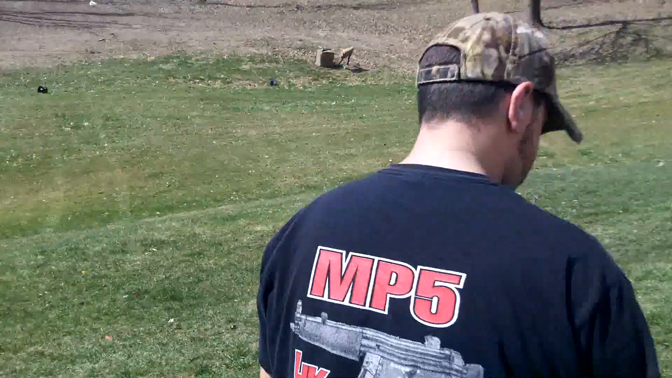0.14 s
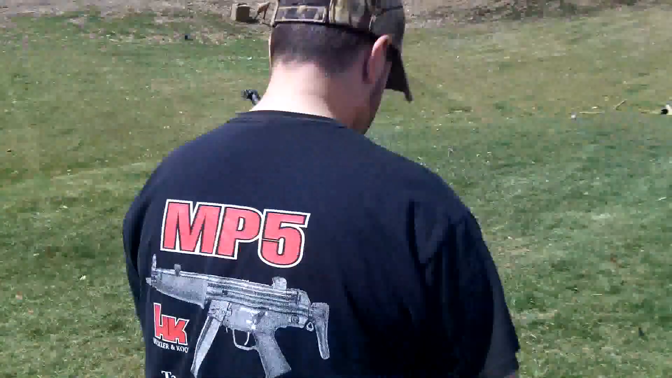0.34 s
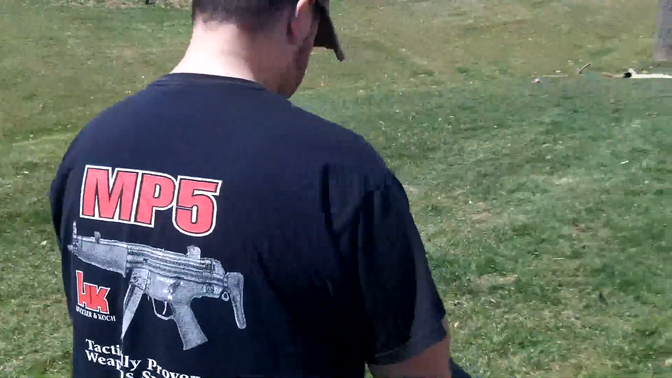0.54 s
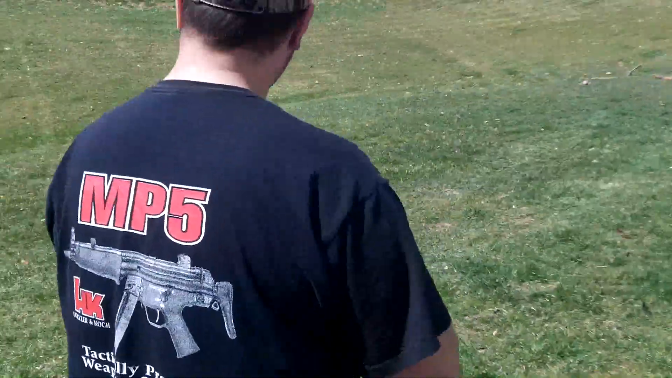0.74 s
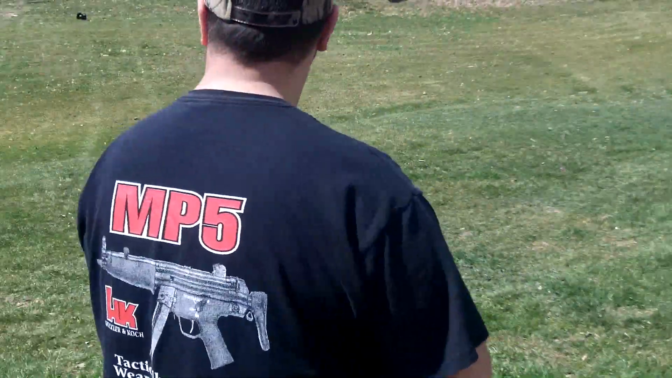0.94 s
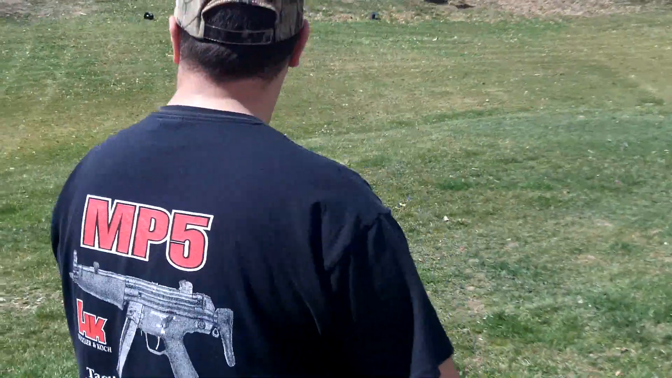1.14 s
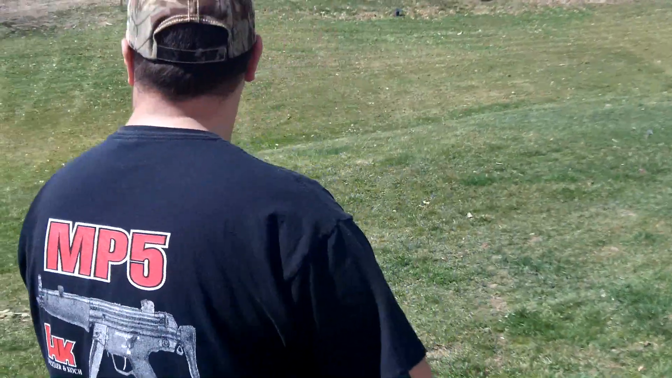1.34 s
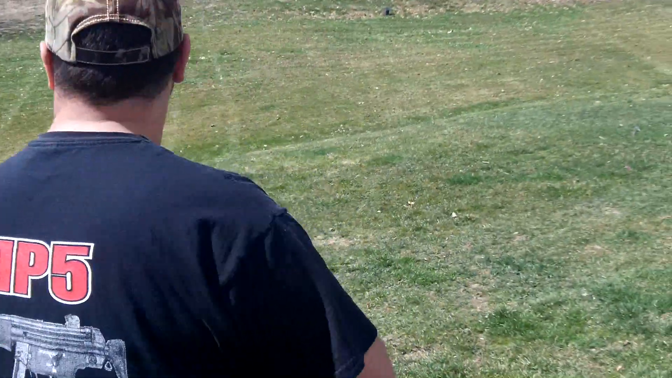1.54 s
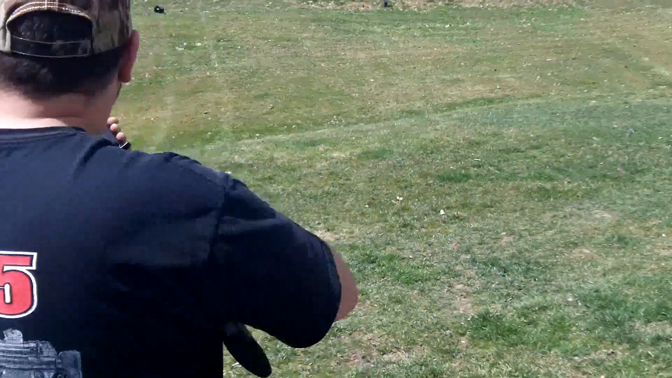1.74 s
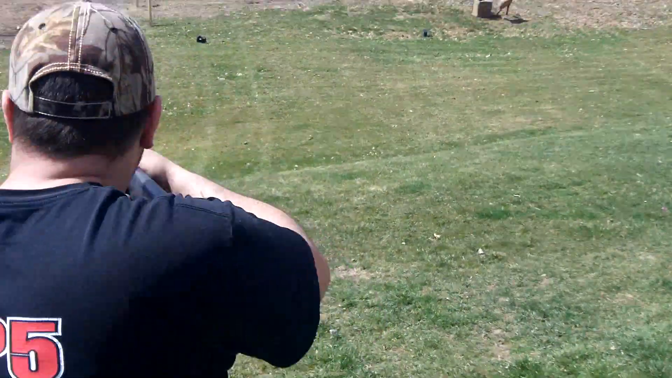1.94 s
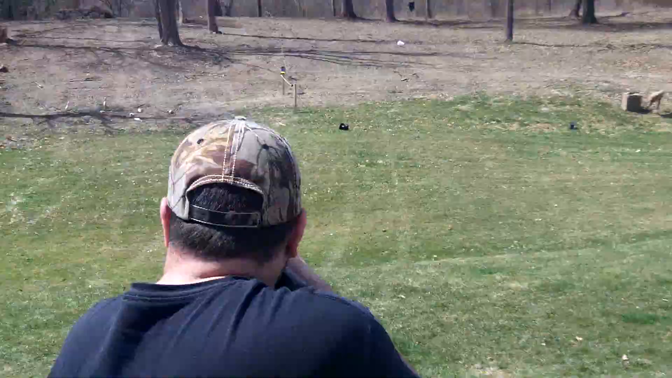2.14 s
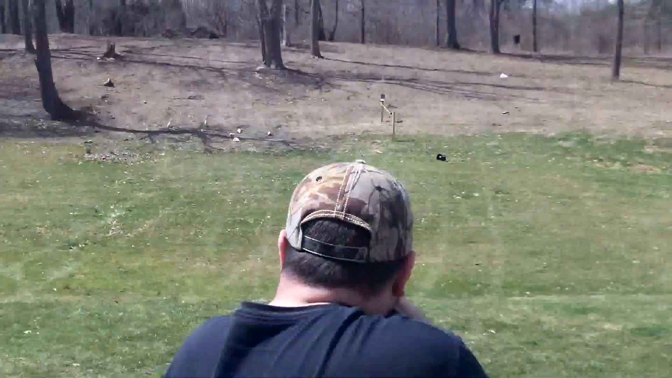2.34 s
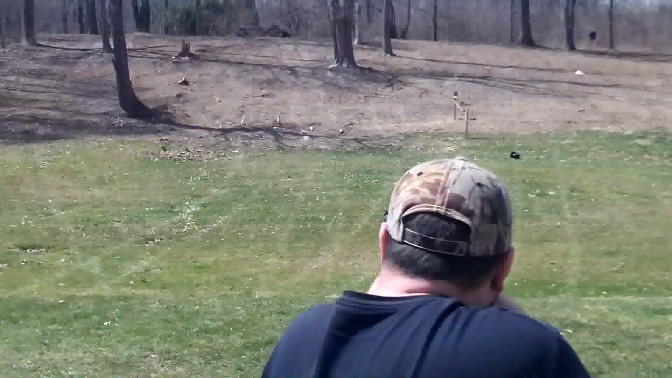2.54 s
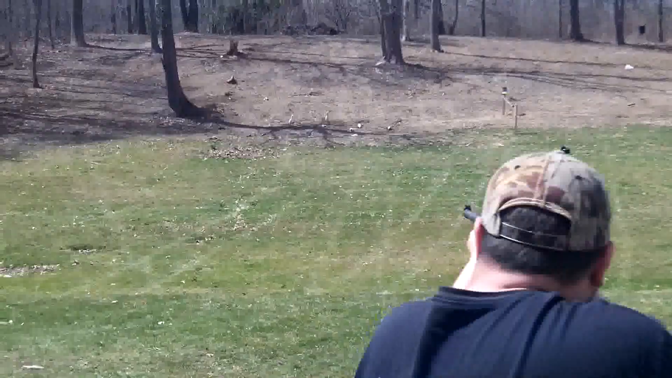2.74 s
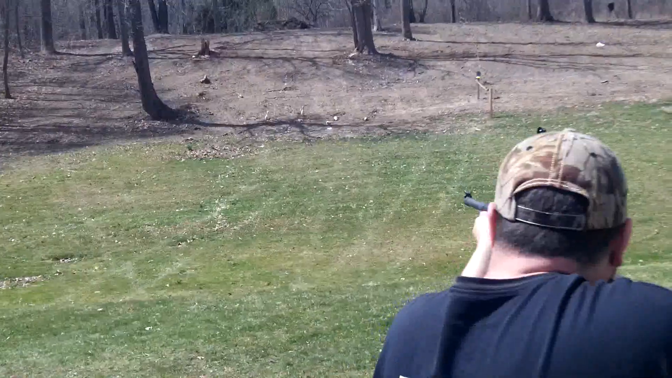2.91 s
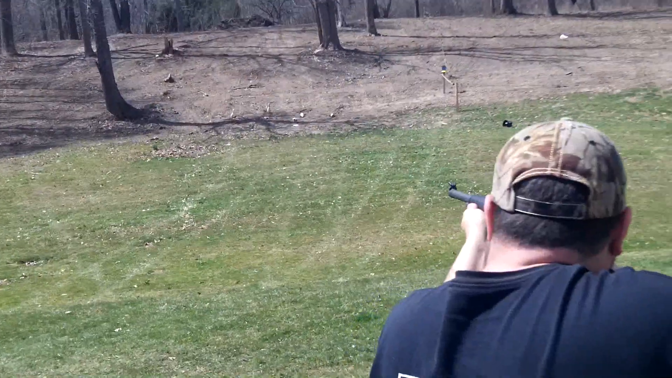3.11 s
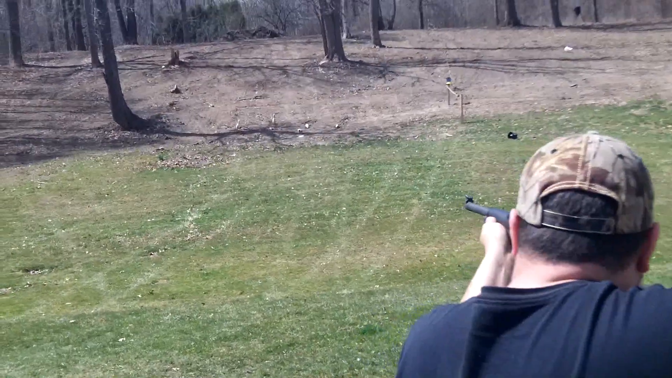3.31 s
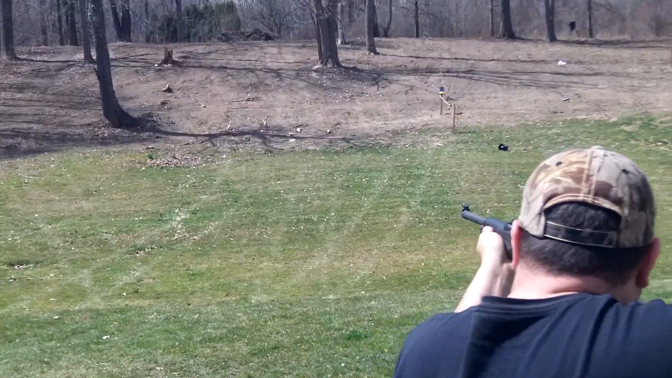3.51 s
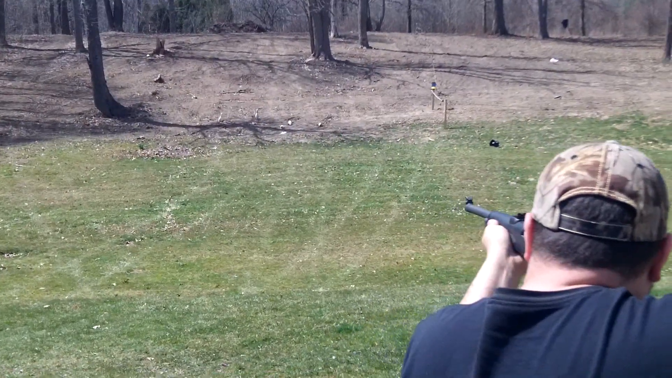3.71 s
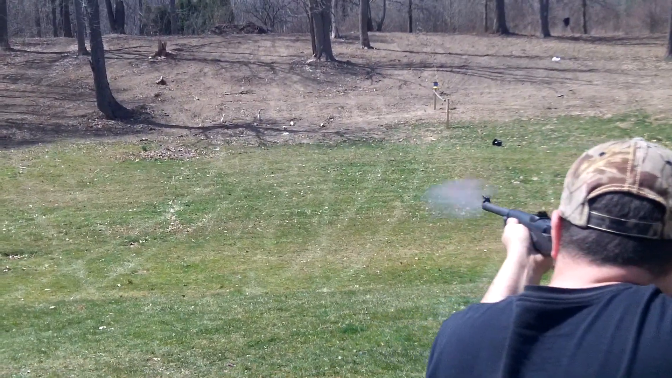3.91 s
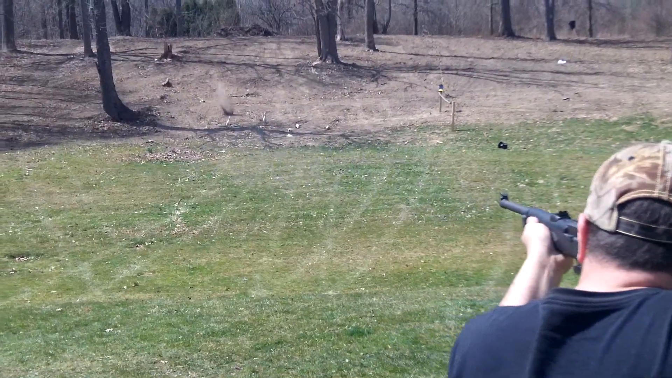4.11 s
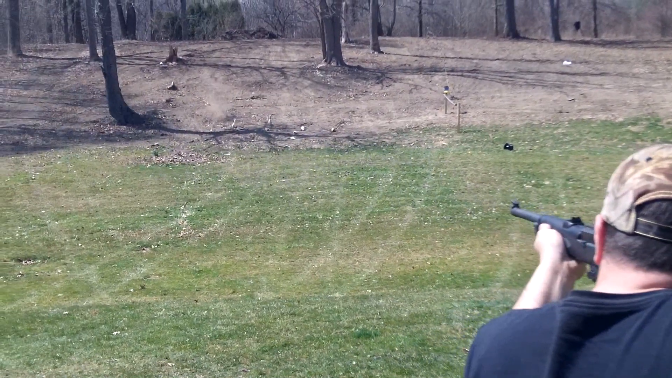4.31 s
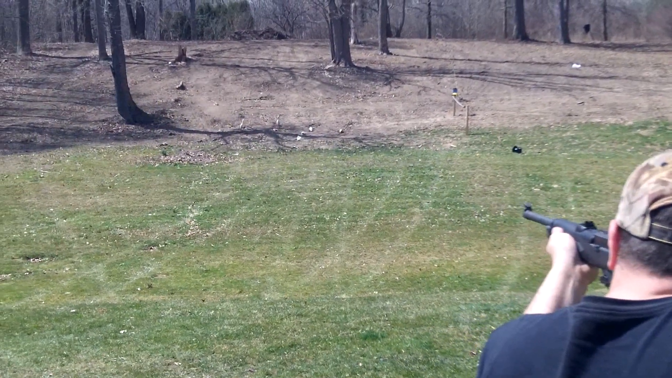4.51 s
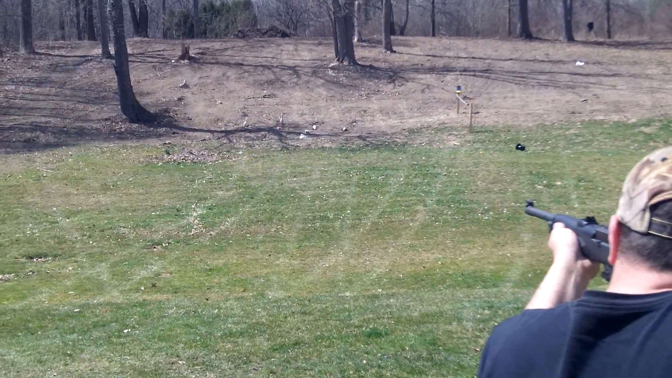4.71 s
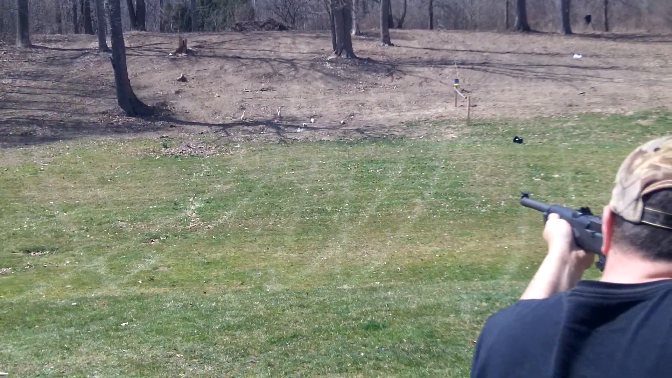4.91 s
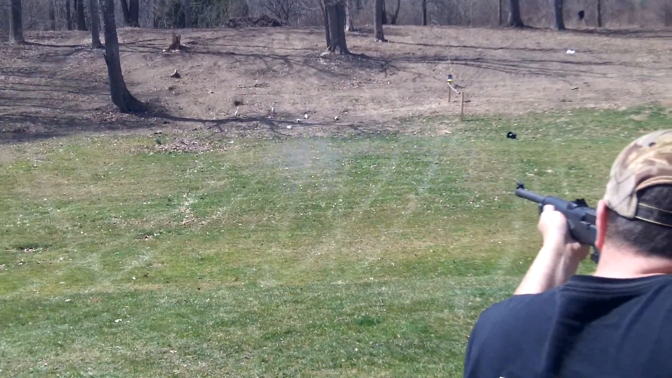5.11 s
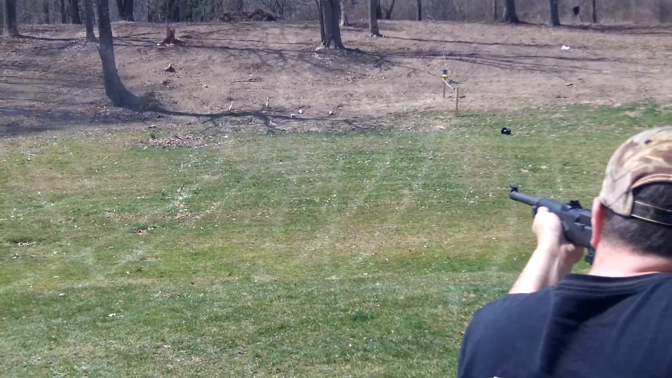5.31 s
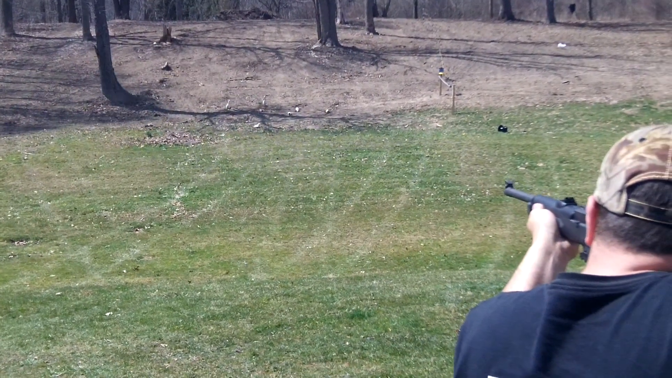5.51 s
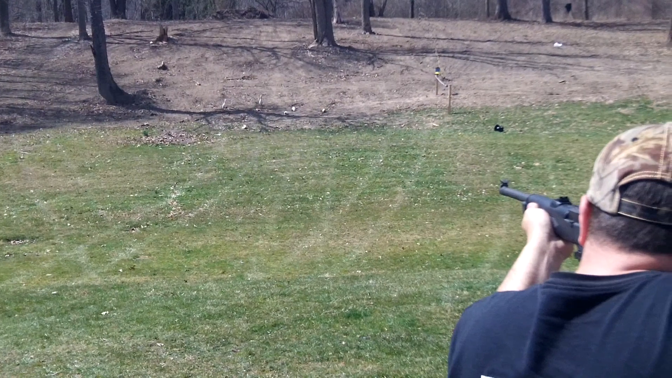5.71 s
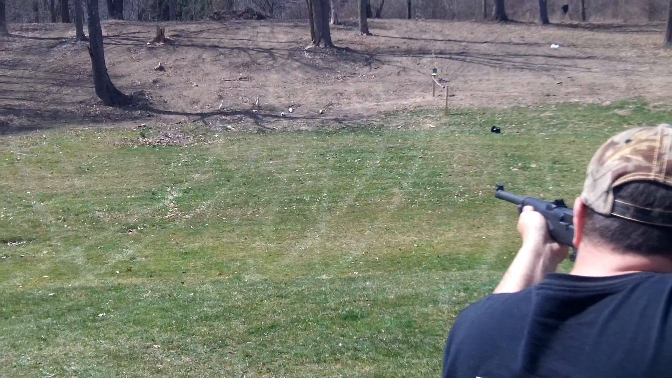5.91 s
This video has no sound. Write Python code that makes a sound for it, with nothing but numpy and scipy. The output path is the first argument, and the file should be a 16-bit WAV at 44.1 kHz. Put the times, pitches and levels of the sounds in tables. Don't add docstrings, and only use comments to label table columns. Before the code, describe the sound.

A sharp metallic bolt clack over breezy field ambience, then two harsh rifle shots about a second apart, each answered by woodland echoes.

```python
import sys
import numpy as np
from scipy import signal
from scipy.io import wavfile
from scipy.ndimage import uniform_filter1d

SR = 44100
rng = np.random.default_rng(int(sys.argv[2]) if len(sys.argv) > 2 else 0)


def gain_from_db(level_db):
    decades = np.asarray(level_db, float) / 20
    return 10 ** decades


def unload_wav(signal):
    wavfile.write(
        sys.argv[1],
        SR,
        np.round(np.clip(np.atleast_2d(signal).T, -1, 1) * 32767).astype(np.int16),
    )


N = 262395
TIME = np.arange(N) / SR

# frequency in Hz, level in dB per Hz.
TREE_COLOUR = [(88, -35), (150, -3), (171, 1.5), (195, -8.5), (364, -4), (458, -8.5), (567, -2), (647, -2),
               (1170, -1.5), (2080, -9), (3400, -25), (4800, -29), (7600, -46.5), (9880, -73),
               (16700, -120)]
# time in seconds, level in dB.
WIND_LEVEL = [(0.0, -27), (0.16, -30.5), (0.56, -34.5), (0.93, -31.5), (2.14, -36), (2.47, -34),
              (2.68, -36), (3.93, -39), (4.06, -54), (4.31, -44), (4.64, -31), (4.91, -27.5), (4.94, -28),
              (5.07, -54), (5.33, -32), (5.5, -31.5), (5.95, -34.5)]
# frequency in Hz, level in dB per Hz.
WIND_COLOUR = [(12, -34), (20, 2), (102, -1), (139, -7.5), (166, -5), (195, -10), (300, -17), (390, -34),
               (660, -120)]
# start in seconds, depth in dB, recovery in seconds.
GAIN_DIVES = [
    (0.601, 6, 0.085),
    (4.043, 33, 1.7),
    (5.088, 28, 1.1),
]
# depth in dB, hold in seconds, recovery in seconds.
HISS_GATES = [
    (21, 0.27, .75),
    (40, 0.69, 0.37),
]
# start in seconds, peak in dB.
SCUFFS = [
    (.355, -40),
    (.397, -37),
    (0.423, -33),
    (.47, -41),
    (3.267, -43),
]
# start in seconds, peak in dB, ring in Hz, rise in seconds.
BOLT_BLOWS = [
    (.6023, -1, 2150, .00038),
    (.6033, -8, 2400, .0004),
    (.6046, -13, 1850, .0005),
    (.6066, -7, 2850, .0006),
]
# start in seconds, offset the overload leaves on the diaphragm (full scale 1).
SHOTS = [
    (4.0376, .08),
    (5.0840, -.2),
]
# frequency in Hz, width in Hz, level in dB.
BLAST_MODES = [(450, 400, -7), (1250, 500, -6), (2050, 600, -3), (2950, 600, -4), (4050, 700, 0),
               (4900, 800, -4), (6200, 900, -13)]
# delay after the blast in seconds, level in dB, rebound as a share.
BOUNCES = [
    (.0077, -7, .9),
    (.0087, -2, .2),
]
# time after the blast in seconds, level in dB.
WOOD_LEVEL = [(.01, -32), (.045, -36.5), (.07, -44), (.1, -36.5), (.17, -33), (.24, -26), (.32, -24.5),
              (.44, -21), (.63, -21.5)]
# frequency in Hz, level in dB per Hz.
WOOD_COLOUR = [(100, -40), (140, -5), (274, -2.5), (450, -1), (960, 1), (1350, -1), (2350, -6.5),
               (3000, -8.5), (4000, -16.5), (4700, -15), (5800, -45), (6600, -35.5), (7500, -40)]
# pace of the return (1 is normal), fade after the last trunks
# in dB per second, brightness in dB per octave, its fall per second, treble loss in dB per second.
WOOD_ANSWERS = [
    (.92, 10.5, 2.5, 3.5, 24),
    (1.0, -2.5, 2, 1.5, 27),
]
# start in seconds, peak in dB, centre in Hz, treble in dB.
ECHOES = [(4.084, -11, 2300, 4), (4.123, -17, 1890, -8), (4.238, -4.5, 1820, -9), (4.248, 6.5, 740, 3.5),
          (4.251, 4, 1490, -5), (4.31, 3.5, 1160, -17), (4.312, 4, 810, 5), (4.346, -1, 1070, -20),
          (4.378, -4, 910, -17), (4.427, -7, 1340, -20), (4.434, 1.5, 1200, -4), (4.474, -1, 926, 2),
          (5.132, -11, 2070, 0), (5.169, -12, 2340, -12), (5.214, -14, 450, -10), (5.253, -10.5, 400, -12),
          (5.267, -6, 550, -14), (5.302, -7, 504, -20), (5.279, 7, 1840, -4), (5.293, -2, 1970, -2),
          (5.295, 0, 1600, -8), (5.33, 2.5, 1750, -7), (5.357, 4.5, 1600, -11), (5.41, -4, 1010, 0),
          (5.456, 1, 1760, -20), (5.471, -0.5, 1160, -14), (5.517, 3.5, 1520, -9), (5.554, -7, 1320, -22),
          (5.836, 0, 1320, -28)]
# start in seconds, peak in dB, pitch in Hz, 60 dB decay in seconds.
BOOMS = [
    (4.229, -32, 168, 0.066),
    (4.252, -17.5, 490, .04),
    (4.259, -23.5, 131, 0.031),
    (4.31, -19.5, 342, 0.02),
    (5.255, -26, 222, 0.082),
]
# start in seconds, peak in dB, pitch in Hz.
PUFFS = [(4.468, -15.5, 214), (4.563, -21, 276), (4.664, -22, 350), (4.785, -16, 205), (4.8, -16, 152),
         (4.847, -3, 392), (4.868, -8.5, 101), (4.924, -7, 333), (5.017, -13, 97), (5.033, -11, 380),
         (5.044, -7, 245), (5.659, -18.5, 245), (5.74, -11, 290), (5.775, -11.5, 98)]


def rms_one(x):
    return x / np.sqrt(np.mean(x ** 2) + 1e-20)


def peak_one(x):
    return x / np.max(np.abs(x))


def band(x, low_hz, high_hz, order=2):
    return signal.sosfilt(signal.butter(order, [low_hz, high_hz], "band", fs=SR, output="sos"), x)


def resonate(x, hz, width_hz):
    r = np.exp(-np.pi * width_hz / SR)
    feedback = [1, -2 * r * np.cos(2 * np.pi * hz / SR), r * r]
    return signal.lfilter([(1 - r * r) / 2, 0, (r * r - 1) / 2], feedback, x)


def add(out, s, piece):
    i = round(s * SR)
    out[i:i + len(piece)] += piece[:N - i]


def drift(rate_hz):
    r = np.exp(-80 * np.pi * rate_hz / SR)
    slow = signal.lfilter([1], [1, -2 * r, r * r], rng.standard_normal(N // 40 + 2002))[2000:]
    return np.interp(np.arange(N) / 40, np.arange(len(slow)), rms_one(slow))


def coloured(sources, spectrum, patchy_db, rate_hz, tilt_db=0, air_db=0):
    hz, level_db = np.transpose(spectrum)
    edges = np.geomspace(hz[0], hz[-1], round(3 * np.log2(hz[-1] / hz[0])) + 1)
    together = drift(rate_hz / 4)
    bands, power = 0, 0
    for k, (low, high) in enumerate(zip(edges, edges[1:])):
        mid = np.sqrt(low * high)
        one = band(sources[k % 2], low, high) * gain_from_db(np.interp(np.log(mid), np.log(hz), level_db))
        power += np.mean(one ** 2)
        slope_db = tilt_db * np.log2(min(mid, 2500) / 1500) + air_db * max(mid / 2500 - 1, 0)
        flicker_db = patchy_db * (0.52 * together + drift(rate_hz))
        bands = bands + one * gain_from_db(flicker_db + slope_db)
    return bands / np.sqrt(power)


def ducking():
    dives = [depth_db * np.clip(1 - (TIME - s) / back, 0, 1) * (TIME > s) for s, depth_db, back in GAIN_DIVES]
    return -np.max(dives, axis=0)


def since_shot():
    starts = np.array(SHOTS)[:, 0]
    which = np.clip(np.searchsorted(starts, TIME) - 1, 0, None)
    return TIME - starts[which], which


def trees():
    gain_db = ducking()
    return gain_from_db(-29 + gain_db) * coloured(rng.standard_normal((2, N)), TREE_COLOUR, 0.93, 11.0, 0, .6 * gain_db)


def wind_rumble():
    level_db = np.interp(TIME, *np.transpose(WIND_LEVEL))
    return gain_from_db(level_db) * coloured(rng.standard_normal((2, N)), WIND_COLOUR, 1.44, 9.9)


def spotty(x, kept):
    cells = signal.stft(x, nperseg=1024)[2]
    keep = rng.random((cells.shape[0] // 2 + 1, cells.shape[1])) < kept
    keep = keep.repeat(2, axis=0)[:len(cells)]
    return rms_one(signal.istft(cells * keep, nperseg=1024)[1][:N])


def hiss():
    since, which = since_shot()
    depth_db, hold, back = np.array(HISS_GATES)[which].T
    sag_db = 2 + 5 * np.sin(np.pi * np.clip(since / 0.86, 0, 1))
    lower_db = -64.5 - sag_db * (since > 0)
    upper_db = -61 - depth_db * np.clip(1 - (since - hold) / back, 0, 1) * (since > 0)
    white = spotty(rng.standard_normal(N + 2048), .42)
    out = gain_from_db(lower_db) * rms_one(band(white, 8710, 11460, order=6))
    out += gain_from_db(upper_db) * rms_one(band(white, 11090, 14800, order=6))
    rim = rms_one(band(white, 6900, 7440, order=8))
    return out + gain_from_db(-81.5 + ducking()) * rim


def whine():
    since, _ = since_shot()
    is_open = (since < 0) | (since > .62)
    return gain_from_db(-76 + .25 * ducking()) * is_open * np.sin(2 * np.pi * 7680 * TIME)


def sling():
    out, t = np.zeros(N), np.arange(SR // 50) / SR
    for s, peak_db in SCUFFS:
        scuff = band(rng.standard_normal(len(t)), 2500, 6000) * np.exp(-t / .005)
        add(out, s, gain_from_db(peak_db) * peak_one(scuff))
    drag = np.exp(-((TIME - 0.416) / 0.064) ** 2)
    return out + gain_from_db(-46) * drag * rms_one(band(rng.standard_normal(N), 2800, 4200))


def bolt():
    out, t = np.zeros(N), np.arange(SR // 50) / SR
    for s, peak_db, hz, rise in BOLT_BLOWS:
        ring = np.sin(2 * np.pi * hz * t) + 0.29 * band(rng.standard_normal(len(t)), 4000, 5080)
        swell = t ** 2 * np.exp(-t / np.clip(rise, .0002, .001) * 1.8)
        add(out, s, gain_from_db(peak_db) * peak_one(ring * swell))
    return out


def blast_colour(x):
    return sum(gain_from_db(db) * rms_one(resonate(resonate(x, hz, width), hz, width)) for hz, width, db in BLAST_MODES)


def shots():
    out, t = np.zeros(N), np.arange(SR // 8) / SR
    shared = rng.standard_normal(len(t))
    overload_s, last_bounce_s = .0045, BOUNCES[1][0]
    for s, offset in SHOTS:
        turbulence = rms_one(blast_colour(shared + 0.67 * rng.standard_normal(len(t))))
        overload = np.clip(t / .0008, 0, 1) * (t < overload_s)
        pressure = -np.sin(2 * np.pi * 760 * (t - .0009)) * (t > .0009) * np.exp(-t / .004)
        shot = np.clip((gain_from_db(-1) * turbulence + gain_from_db(3) * pressure) * overload, -1, 1)
        shot += gain_from_db(-16) * turbulence * (t >= overload_s) * np.exp((overload_s - t) / .004)
        shot += offset * np.clip((t - overload_s) / .0005, 0, 1) * (t < last_bounce_s)
        for lag, db, rebound in BOUNCES:
            u = (t - lag) / .0001
            shot -= gain_from_db(db) * (np.exp(-u ** 2) - rebound * np.exp(-(u - 2) ** 2))
        since = np.clip(t - last_bounce_s, 0, 1)
        rattle = rms_one(band(turbulence, 1500, 4800)) * (since > .0002) * np.exp(-since / .005)
        shot += gain_from_db(-16) * rattle
        rest = gain_from_db(-10) * np.exp(-since / .004) - gain_from_db(-20) * np.sin(since / .012) * np.exp(-since / .02)
        add(out, s, shot + np.clip(since / .0003, 0, 1) * rest)
    return out


def wood():
    since, which = since_shot()
    pace, fade, bright_db, dulling, air_loss = np.array(WOOD_ANSWERS)[which].T
    progress = since * pace
    level_db = np.interp(progress, *np.transpose(WOOD_LEVEL))
    level_db -= fade * np.clip(progress - WOOD_LEVEL[-1][0], 0, None)
    air_db = np.maximum(13 - air_loss * np.abs(since), -24)
    tilt_db = bright_db - dulling * np.clip(since, 0, None)
    strength_db = 2.0 * np.minimum(rng.exponential(1, (2, N)), 5)
    grains = rng.standard_normal((2, N)) * gain_from_db(strength_db) * (rng.random((2, N)) < .15)
    return gain_from_db(level_db) * (since > .005) * coloured(grains, WOOD_COLOUR, 1.42, 28, tilt_db, air_db)


def burst(t, hz, smear_s, treble_db):
    clicks = rng.standard_normal(len(t)) ** 3 * np.clip(t / 0.00014, .3, 1) * np.exp(-(t / smear_s) ** 2)
    body = peak_one(band(clicks, hz / 1.6, hz * 1.495, order=3))
    treble = peak_one(resonate(band(clicks, 1670, 4840), 2070, 2400))
    return peak_one(body + gain_from_db(treble_db) * treble)


def echoes():
    out, t = np.zeros(N), np.arange(SR // 25) / SR
    for s, peak_db, hz, treble_db in ECHOES:
        add(out, s, gain_from_db(peak_db - 8) * burst(t, hz, 0.0046, treble_db))
    return out


def thump(peak_db, hz, t60):
    t = np.arange(SR // 10) / SR
    push = -np.sin(2 * np.pi * hz * t) * t / (t + 0.00089) * gain_from_db(-60 * t / max(t60, .005))
    return gain_from_db(peak_db - 1) * peak_one(push)


def booms():
    out = np.zeros(N)
    for s, peak_db, hz, t60 in BOOMS:
        add(out, s, thump(peak_db, hz, t60))
    return out


def wind_puffs():
    out = np.zeros(N)
    for s, peak_db, hz in PUFFS:
        add(out, s, thump(peak_db, hz, 0.0077 * gain_from_db(-0.97 * peak_db)))
    return out


def scene():
    blasts = shots()
    clicks = gain_from_db(-3) * echoes() + sling() + bolt()
    air = trees() + wind_rumble() + wind_puffs()
    path_end = signal.cheby2(14, 50, 7600, fs=SR, output="sos")
    field = signal.sosfilt(path_end, blasts + clicks + wood() + booms() + air)
    sharp = blasts + gain_from_db(-3) * clicks
    loudness = uniform_filter1d(sharp ** 2, size=40)
    top = band(sharp * loudness * np.cos(2 * np.pi * 8200 * TIME), 8500, 16000, order=6)
    return (field + gain_from_db(-7.5) * top + hiss() + whine())[None]


def band_limit(x):
    return signal.sosfilt(signal.butter(12, 16440, fs=SR, output="sos"), x)


def record(dry):
    top_cut = signal.cheby2(12, 80, 16400, fs=SR, output="sos")
    mix = signal.sosfilt(top_cut, np.clip(dry, -.93, .93))
    return band_limit(mix)


dry = scene()
out = record(dry)
unload_wav(out)
```